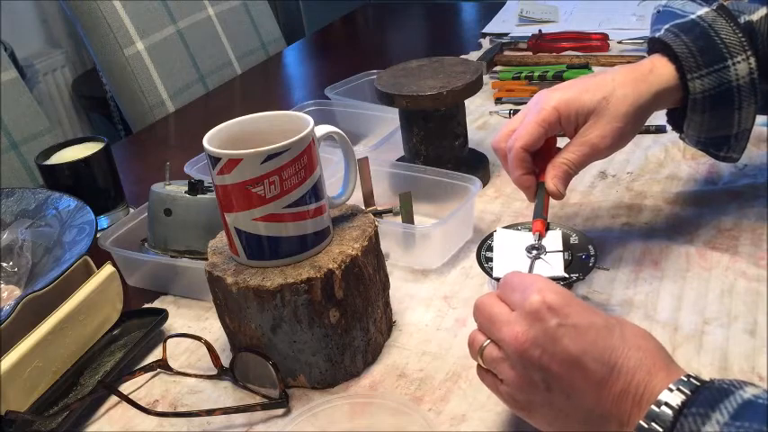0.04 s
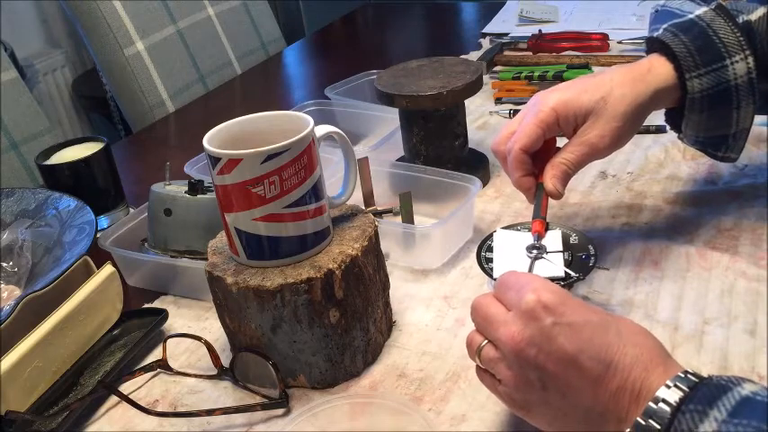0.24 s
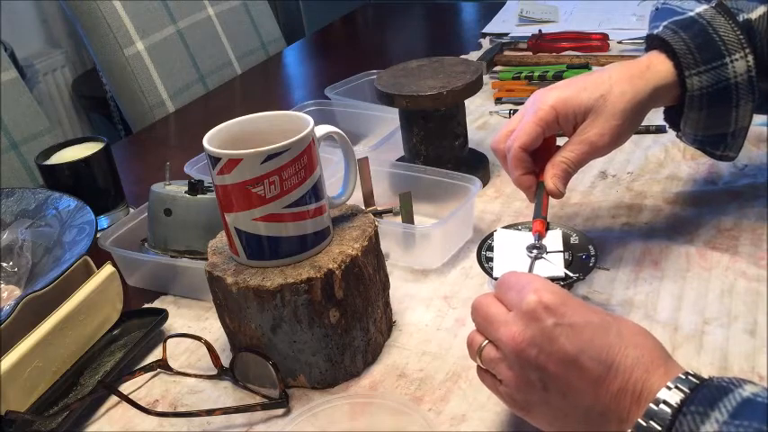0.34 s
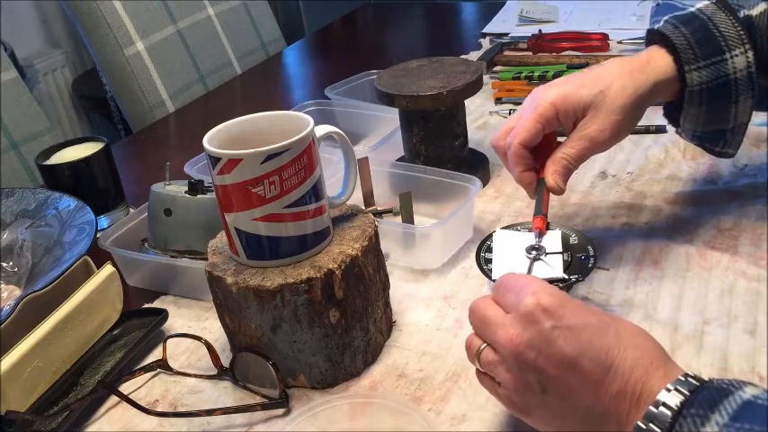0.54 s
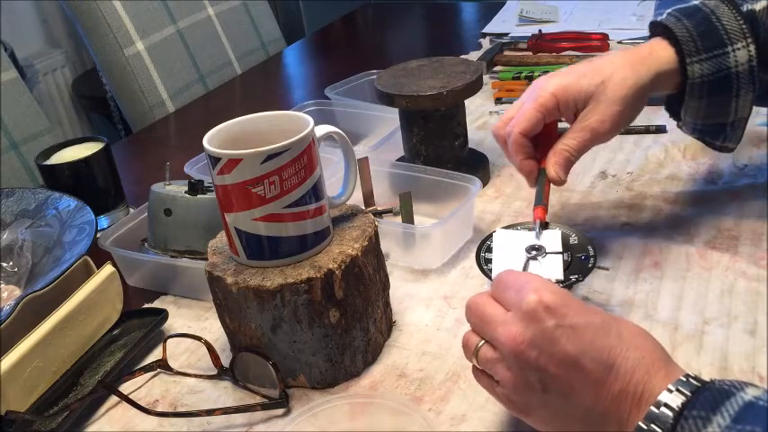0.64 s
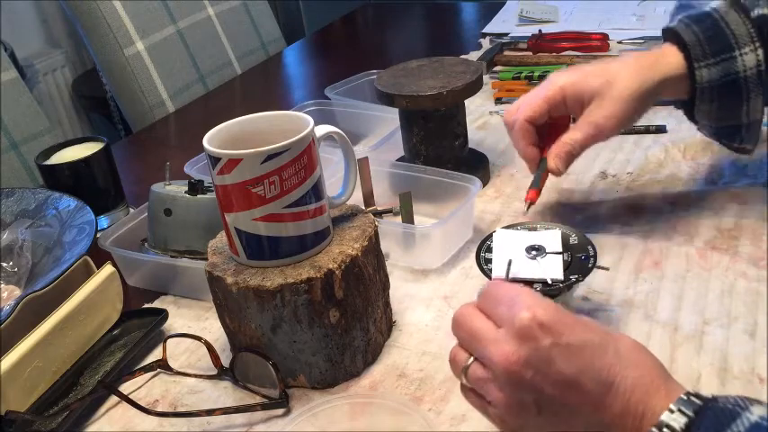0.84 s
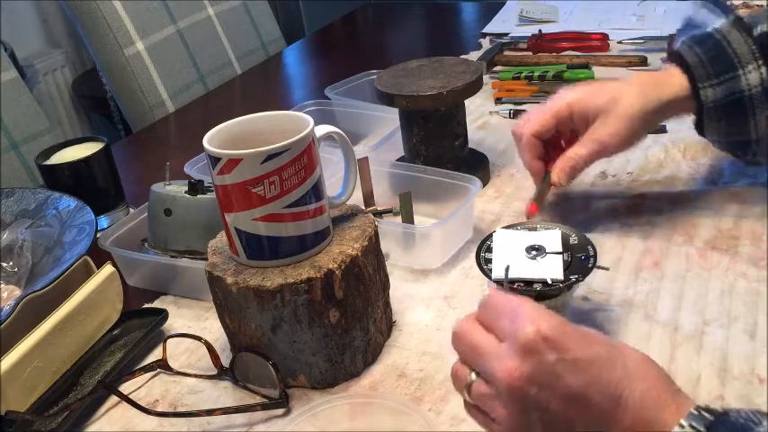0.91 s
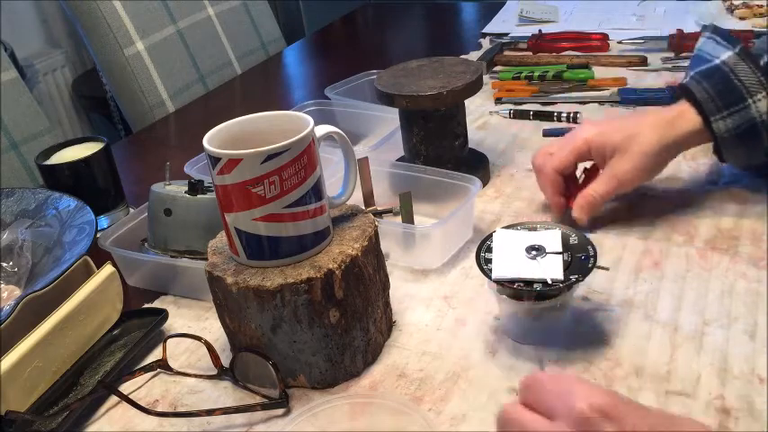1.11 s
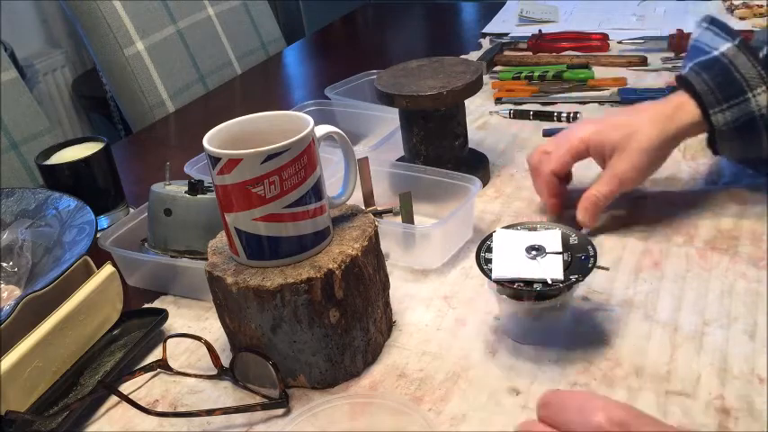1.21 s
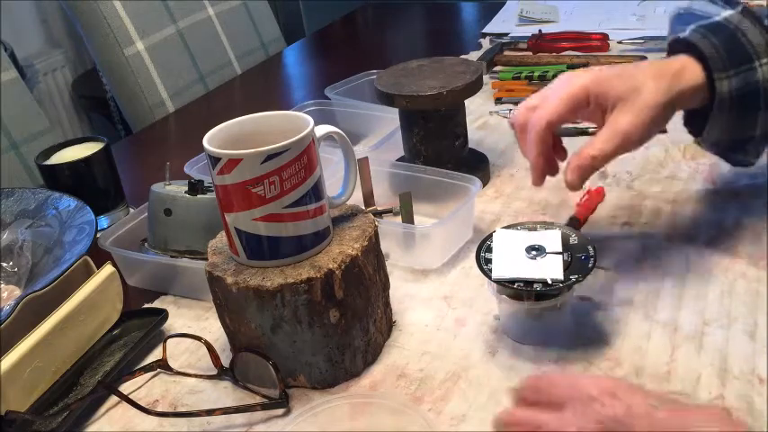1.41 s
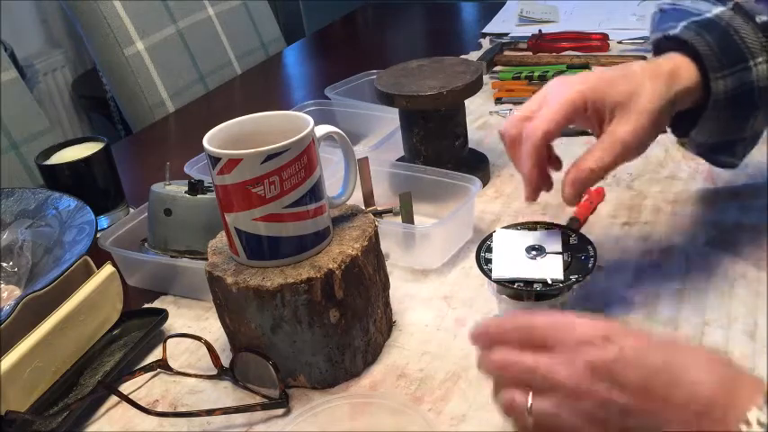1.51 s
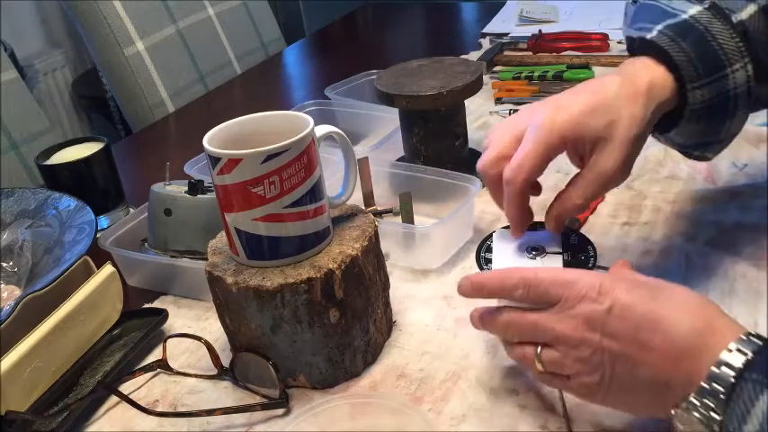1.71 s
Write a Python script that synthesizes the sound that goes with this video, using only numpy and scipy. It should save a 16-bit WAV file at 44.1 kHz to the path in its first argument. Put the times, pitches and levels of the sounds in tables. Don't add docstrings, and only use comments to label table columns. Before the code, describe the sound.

A sharp, bright metallic pop at about 0.24 seconds, preceded by a tiny creak, as a needle snaps off a small dial; brief ringing and loose rattle follow. From 0.53 to 0.87 seconds, faint blade ticks, scrapes and housing nudges, strongest near 0.8. Plastic handles knock the padded table at 1.33 and, more softly, 1.50. Quiet room, close phone microphone, low hum, hiss, short tail.

```python
import sys
import numpy as np
from scipy import signal
from scipy.fft import rfft, irfft
from scipy.io import wavfile
from scipy.ndimage import uniform_filter1d

SR = 44100
rng = np.random.default_rng(int(sys.argv[2]) if len(sys.argv) > 2 else 0)


def gain_from_db(level_db):
    decades = np.asarray(level_db, float) / 20
    return 10 ** decades


def wav_out(sig):
    wavfile.write(sys.argv[1], SR, np.round(np.clip(np.atleast_2d(sig).T, -1, 1) * 32767).astype(np.int16))


N = 77175

# f [Hz], level [dB per Hz]
AIR_SPECTRUM = [(41, -22), (70, -2.5), (554, -15.5), (744, -16), (934, -17.5), (1200, -20.5), (1310, -18.5),
                (6900, -29), (16000, -35.5)]
# f [Hz], t60 [s]
ROOM_DECAY = [(100, 0.43), (260, 0.27), (700, 0.3), (1840, 0.41), (4850, 0.29), (12800, 0.14)]
# f [Hz], level [dB], t60 [s]
HOUSING_MODES = [(1150, 1.5, 0.0087), (1430, -47, .04), (723.6, -13.5, 0.062), (1524, -1, 0.011),
                 (620, -33, 0.028)]
# f [Hz], level [dB], t60 [s]
PLATE_MODES = [(630, -57.5, 0.39), (704, -49.5, 0.16), (745, -52, 0.21), (973, -40, 0.15),
               (1053, -51, 0.37), (1097, -50, 0.45), (1129, -46.5, 0.31), (1205, -50, 0.44),
               (1260, -41.5, .25), (1295, -51, 0.39), (1330, -54.5, 0.43), (1127, -51, 0.52)]
# f [Hz], level [dB], t60 [s]
STEEL_MODES = [(2250, -30.5, 0.009), (3600, -2, 0.042), (3744, -8, 0.06), (4150, 10.5, 0.018),
               (7000, -23, 0.033), (7960, -28, 0.045), (9500, -7, 0.0074), (11560, 6.5, 0.023),
               (12160, 4, .03), (14300, -12.5, 0.0124), (15490, -14.5, .012), (11320, -12, 0.13),
               (5800, -10.5, .05)]
# f [Hz], level [dB], t60 [s]
THUMP_MODES = [(106.4, -47, 0.093), (318, -49, 0.12), (611, -52.5, 0.25), (675, -51.5, 0.23)]
# t [s], level [dB], f [Hz], width
RATTLES = [(.2430, -40.5, 4000, 0.75), (0.2435, -45.5, 9000, 1), (0.247, -44.5, 11500, 0.25),
           (.2545, -38, 3000, .6), (.2560, -47, 12000, .4), (.2760, -55, 14500, .15),
           (0.2754, -47.5, 3880, 0.51), (0.249, -56, 5500, 0.37), (.2650, -52, 5800, 0.33),
           (.5380, -53, 12800, 0.44), (.6225, -62, 12000, .4), (0.634, -57, 10000, .4),
           (.2385, -34.5, 11760, 0.22), (1.3350, -51.5, 3600, 0.16), (1.5025, -46, 5560, 0.26)]
# t [s], level [dB], f [Hz], t60 [s]
TABLE_THUDS = [
    (.3000, -56, 152, 0.12),
    (0.31, -54, 220, .1),
    (.8150, -61.5, 334, 0.061),
    (1.3600, -46, 130, 0.27),
    (1.3620, -45.5, 210, .1),
    (1.5450, -50, 147, 0.31),
    (1.2100, -61.5, 174, 0.058),
    (1.2490, -44.5, 357, 0.04),
    (0.95, -62.5, 210, 0.07),
    (1.2, -86.5, 327, 0.051),
]
# t [s], level [dB], f [Hz], t60 [s]
HOUSING_NUDGES = [(.3450, -51, 1160, 0.06), (.3800, -53, 1129, 0.17), (.5280, -60, 1120, 0.096),
                  (.5390, -58, 1067, 0.028), (.5525, -47, 1053, 0.023), (.6010, -57, 1066, 0.016),
                  (.7060, -56, 1050, 0.035), (.7780, -55, 1024, 0.13), (.7970, -43.5, 1023, 0.02),
                  (.8030, -34, 1040, 0.017), (.8030, -41, 1370, 0.016), (.8130, -42, 1080, 0.049),
                  (.8185, -37.5, 1016, 0.042), (.8240, -36.5, 1124, 0.011), (.8500, -54, 1080, 0.06),
                  (.8580, -54.5, 1120, 0.034), (.8650, -60, 1150, 0.033)]
# t [s], level [dB]
SLIDE_PRESSURE = [(.52, -79), (.54, -71), (.565, -102), (.69, -82), (.71, -70.5), (.745, -64.5),
                  (.775, -61.5), (0.798, -74), (0.819, -48.5), (0.839, -82), (.87, -97)]
# f [Hz], level [dB], t60 [s]
BLADE_MODES = [(6910, 5, 0.0027), (6690, 1, 0.0048), (4460, -8.5, 0.0042), (11300, 4.5, 0.001),
               (14800, -5.5, 0.0055), (8800, -19, 0.0024), (13060, -5.5, 0.0017), (1080, -10.5, 0.016),
               (5500, -3.5, 0.00083)]
# t [s], level [dB], f [Hz], t60 [s]
BLADE_TICKS = [(0.537, -47, 11830, 0.0031), (.5390, -57, 4270, 0.016), (0.533, -57, 4360, 0.016),
               (0.55, -64, 4460, 0.016), (0.5463, -52, 10200, 0.0052), (0.548, -51, 14500, .008),
               (.5545, -61, 10000, .01), (0.5992, -55, 10200, 0.019), (0.609, -65, 9600, 0.011),
               (0.62, -58, 8800, 0.0047), (0.629, -59, 9500, 0.0084), (.6350, -57, 9300, 0.0046),
               (0.653, -47, 10030, 0.0091), (0.655, -57, 11400, 0.014), (.7060, -57.5, 7100, 0.062),
               (.7160, -58.5, 7170, .03), (0.724, -59.5, 7000, 0.022), (.7380, -53, 7200, .02),
               (.8030, -58, 3400, 0.0069), (.8200, -49, 3510, 0.013), (.7710, -44.5, 7150, 0.024),
               (0.777, -48, 7170, .015), (.7980, -47, 7150, 0.022), (0.813, -44, 14600, 0.013),
               (0.815, -48, 11800, .012), (.8190, -72, 7340, 0.009), (0.821, -49.5, 5490, 0.024),
               (0.761, -52, 10600, 0.022), (.7430, -53, 6630, 0.03), (1.4255, -56, 9500, 0.0053),
               (1.4310, -66, 8400, .004), (1.43, -56.5, 2740, 0.016)]
# t [s], level [dB], click [dB], room send [dB], click f [Hz]
HANDLE_KNOCKS = [
    (1.3344, -15.5, -42.5, -6, 3600),
    (1.5025, -20.5, -36, -5.5, 2560),
]
# f [Hz], level [dB], t60 [s]
TABLE_FIRST = [(124.4, -25, 0.24), (320.6, 3, 0.024), (348.5, 3, 0.036), (433, -10.5, 0.054),
               (605, -3, 0.015), (748, -4, 0.02), (890, -8, 0.016), (1050, -7, 0.035), (1500, -6, 0.01),
               (1850, -4, 0.0032), (2550, -16.5, 0.012), (3140, -17.5, 0.0033)]
TABLE_SECOND = [(146.8, -29.5, 0.36), (361, -4, 0.025), (467, -11.5, 0.054), (570, -6, 0.031),
                (780, -3.5, 0.024), (896, -2, 0.037), (1140, 4, 0.012), (1576, -11, 0.037),
                (1640, -13.5, 0.047), (2030, -5, 0.0091), (2800, -14.5, 0.014), (3670, -11, 0.0039)]
# f [Hz], level [dB], t60 [s]
BOARDS_FIRST = [(302.3, -47, 0.25), (417, -46, 0.28), (489, -47.5, 0.33), (604.3, -44, 0.35),
                (872, -39.5, 0.052), (1120, -47, 0.22), (1424, -63, 0.27), (250, -59, 0.078)]
BOARDS_SECOND = [(418, -45.5, 0.32), (582, -55, 0.48), (725, -54.5, 0.46), (817, -49, 0.11),
                 (950, -40, 0.063), (1320, -54.5, 0.4), (1710, -55, 0.058), (1173, -44, 0.06)]

AIR_DB, FLICKER_DB = -67.5, -0.5
HUM_HZ, HUM_WIDTH_HZ, HUM_DB, HUM_STEADY_DB = 56.1, 6.6, -74, -74.5
ROOM_GAP_S = 0.0022
CREAK_S, CREAK_DB = .2344, -40
POP_S, POP_DB, CRACK_DB, STEEL_DB = .2383, -16, -20.5, -37
POP_ROOM_DB, CRACK_ROOM_DB, STEEL_ROOM_DB = -14, -5, -17
CHATTER_COUNT, CHATTER_S, CHATTER_FADE_DB = 3, .00087, -2.5
SLIP_PER_S, SLIP_SPREAD_DB = 5000, 1.5
TICK_WIDTH_OCT, TICK_EDGE_OCT, TICK_RISE_S = 0.039, 0.2, 0.00077
TICK_CLICK_DB, BLADE_ROOM_DB = 4, -9.5
HANDLE_EDGE_DB, HANDLE_CLICK_ROOM_DB = -1.5, -8


def decay(t, t60):
    return np.exp(-np.log(1000) * t / t60)


def ring(modes, size=16384):
    t = np.arange(size) / SR
    out = np.zeros(size)
    for k, (hz, db, t60) in enumerate(modes):
        sine = np.sin(2 * np.pi * min(hz, .45 * SR) * t)
        out += (-1) ** k * gain_from_db(db) * sine * decay(t, max(t60, .001))
    return out


def add(track, s, x):
    i = int(s * SR)
    track[i:i + len(x)] += x[:N - i]


def band(x, hz, width):
    f = np.maximum(np.fft.rfftfreq(len(x), 1 / SR), 1)
    return irfft(rfft(x) * np.exp(-.5 * (np.log2(f / hz) / width) ** 2), len(x))


def click(t60, hz, width, size=2048):
    noise = band(rng.standard_normal(size), hz, width)
    return noise / np.std(noise) * decay(np.arange(size) / SR, max(t60, .0005))


def air():
    f = np.maximum(np.fft.rfftfreq(N, 1 / SR), 1)
    hz, db = np.transpose(AIR_SPECTRUM)
    shape = gain_from_db(np.interp(np.log(f), np.log(hz), db)) / (1 + (60 / f) ** 4)
    hiss = irfft(rfft(rng.standard_normal(N)) * shape, N)
    out = np.zeros(N)
    for centre in 60 * 2 ** np.arange(0, 9.):
        walk = uniform_filter1d(rng.standard_normal(N), size=3000)
        walk = uniform_filter1d(walk, size=3000)
        out += band(hiss, centre, 0.48) * gain_from_db(FLICKER_DB * walk / np.std(walk))
    hum_shape = np.exp(-.5 * ((f - HUM_HZ) / HUM_WIDTH_HZ * 2) ** 2)
    hum = irfft(rfft(rng.standard_normal(N)) * hum_shape, N)
    steady = gain_from_db(HUM_STEADY_DB) * np.sin(2 * np.pi * HUM_HZ * np.arange(N) / SR)
    return out / np.std(out) * gain_from_db(AIR_DB) + hum / np.std(hum) * gain_from_db(HUM_DB) + steady


def pop():
    body, crack, steel = np.zeros((3, N))
    for k in range(CHATTER_COUNT):
        s, g = POP_S + k * CHATTER_S, gain_from_db(k * CHATTER_FADE_DB)
        add(body, s, g * gain_from_db(POP_DB) * ring(HOUSING_MODES))
        add(crack, s, g * gain_from_db(CRACK_DB) * click(.004, 4470, 3.2))
    creak = click(0.27, 6000, 1.3, size=170) * np.linspace(.3, 1, 170)
    add(crack, CREAK_S, gain_from_db(CREAK_DB) * creak)
    add(crack, POP_S, gain_from_db(-25.5) * click(0.0025, 12000, 0.3))
    add(steel, POP_S, gain_from_db(STEEL_DB) * ring(STEEL_MODES))
    body = signal.sosfilt(signal.butter(2, 210, "high", fs=SR, output="sos"), body)
    add(body, POP_S + 0.00394, ring(THUMP_MODES) + ring(PLATE_MODES))
    for s, db, hz, width in RATTLES:
        add(crack, s, gain_from_db(db) * click(.008, hz, width))
    feed = gain_from_db(POP_ROOM_DB) * body + gain_from_db(CRACK_ROOM_DB) * crack + gain_from_db(STEEL_ROOM_DB) * steel
    return body + crack + steel, feed


def room(x):
    t = np.arange(SR // 2) / SR
    noise = rng.standard_normal(SR // 2)
    decay_hz, decay_s = np.transpose(ROOM_DECAY)
    tail = np.zeros(SR // 2)
    for hz in 60 * 2 ** np.arange(0, 8.6, .5):
        t60 = np.interp(np.log(hz), np.log(decay_hz), decay_s)
        tail += band(noise, hz, 0.94) * decay(t, t60)
    tail *= np.clip(t / ROOM_GAP_S - .5, 0, 1)
    return signal.fftconvolve(x, tail / np.sqrt(np.sum(tail ** 2)))[:N]


def taps(rows, click_db, room_db, above, width, rub_s):
    out = np.zeros(N)
    size = int(rub_s * SR) + 3
    for s, db, hz, t60 in rows:
        tone = np.sin(2 * np.pi * hz * np.arange(size) / SR)
        rub = np.hanning(size) * (rng.standard_normal(size) + tone)
        modes = [(hz, 0, t60), (1.4 * hz, -5, 0.11 * t60), (1.32 * hz, -8, 0.19 * t60)]
        x = signal.fftconvolve(rub, ring(modes, size=8192))
        add(out, s - rub_s / 3, gain_from_db(db) * x / np.max(np.abs(x)))
        add(out, s, gain_from_db(db + click_db) * click(0.04, above * hz, width))
    return out, gain_from_db(room_db) * out


def thuds():
    return taps(TABLE_THUDS, click_db=-18, room_db=-8, above=1.2, width=.3, rub_s=0.003)


def nudges():
    return taps(HOUSING_NUDGES, click_db=-21, room_db=-20.5, above=1.85, width=1.0, rub_s=0.0022)


def slide():
    hits = rng.random(N) < SLIP_PER_S / SR
    strength = gain_from_db(SLIP_SPREAD_DB * rng.exponential(size=N))
    slips = hits * strength * rng.choice([-1, 1], N)
    x = signal.fftconvolve(slips, ring(BLADE_MODES, size=2048))[:N]
    s, db = np.transpose(SLIDE_PRESSURE)
    pressure = gain_from_db(np.interp(np.arange(N) / SR, s, db, left=-120, right=-120))
    x = x / np.std(x) * pressure
    return x, gain_from_db(BLADE_ROOM_DB) * x


def ticks():
    out = np.zeros(N)
    rise = np.clip(np.arange(2048) / SR / TICK_RISE_S, 0, 1)
    for s, db, hz, t60 in BLADE_TICKS:
        narrow = click(2.0 * t60, hz, TICK_WIDTH_OCT)
        edge = gain_from_db(TICK_CLICK_DB) * click(0.0054, hz, TICK_EDGE_OCT)
        add(out, s, gain_from_db(db - 6.0) * rise * (narrow + edge))
    return out, gain_from_db(BLADE_ROOM_DB) * out


def handles():
    out, feed = np.zeros((2, N))
    tops, boards = (TABLE_FIRST, TABLE_SECOND), (BOARDS_FIRST, BOARDS_SECOND)
    for (s, db, click_db, room_db, hz), top, board in zip(HANDLE_KNOCKS, tops, boards):
        add(out, s, ring(board))
        knock = gain_from_db(db - 6.5) * ring(top)
        add(out, s, knock)
        add(feed, s, gain_from_db(room_db) * knock)
        edge = gain_from_db(click_db + HANDLE_EDGE_DB) * click(0.011, 11400, 0.85)
        add(out, s, edge + gain_from_db(click_db) * click(0.015, hz, 0.13))
        room_click = gain_from_db(click_db) * click(0.0059, 2800, 0.27)
        add(feed, s, gain_from_db(HANDLE_CLICK_ROOM_DB) * (edge + room_click))
    return out, feed


def scene():
    parts = [pop(), thuds(), nudges(), slide(), ticks(), handles()]
    direct = sum(p[0] for p in parts)
    feed = sum(p[1] for p in parts)
    return (direct + room(feed) + air())[None]


def roll_off(x):
    return signal.sosfilt(signal.butter(12, 16990, fs=SR, output="sos"), x)


def record(dry):
    x = signal.sosfilt(signal.butter(2, 30, "high", fs=SR, output="sos"), dry)
    mix = signal.sosfilt(signal.ellip(6, .2, 40, 15900, fs=SR, output="sos"), x)
    return roll_off(mix)


dry = scene()
out = record(dry)
wav_out(out)
```